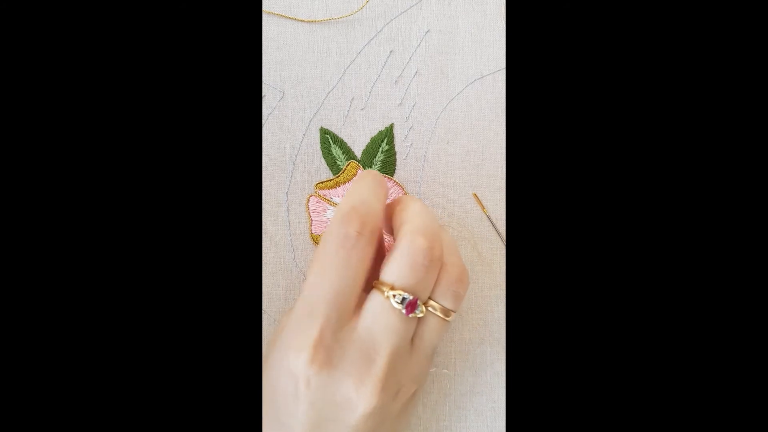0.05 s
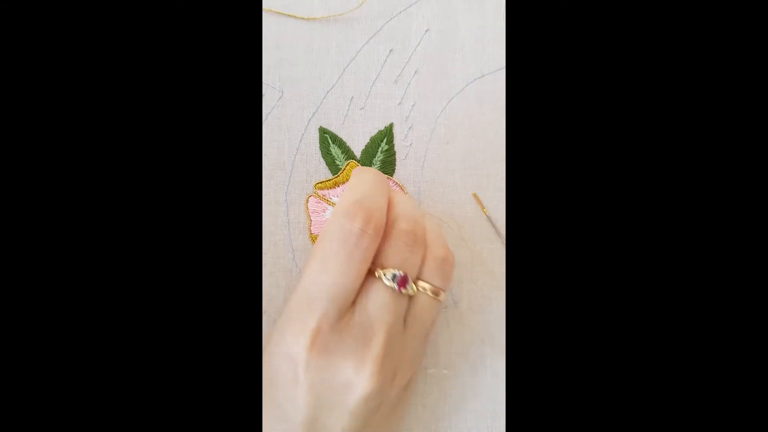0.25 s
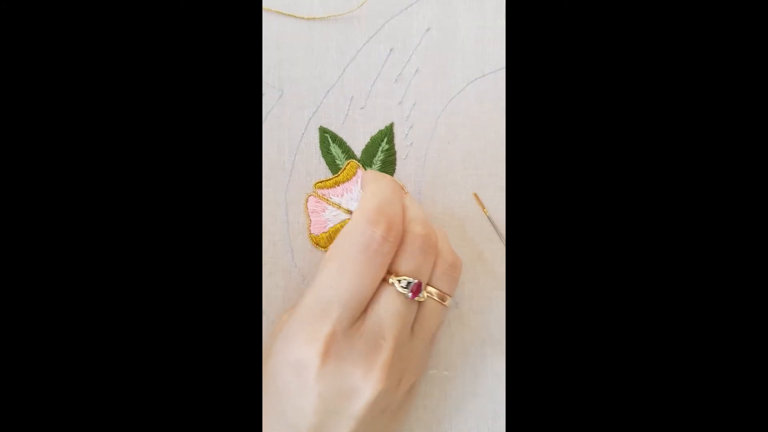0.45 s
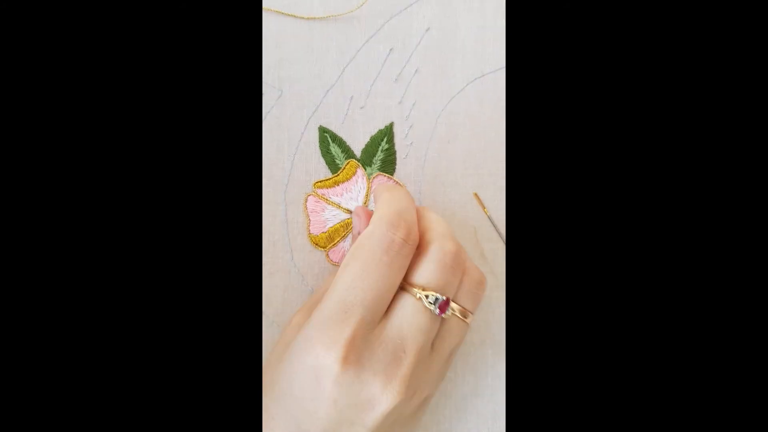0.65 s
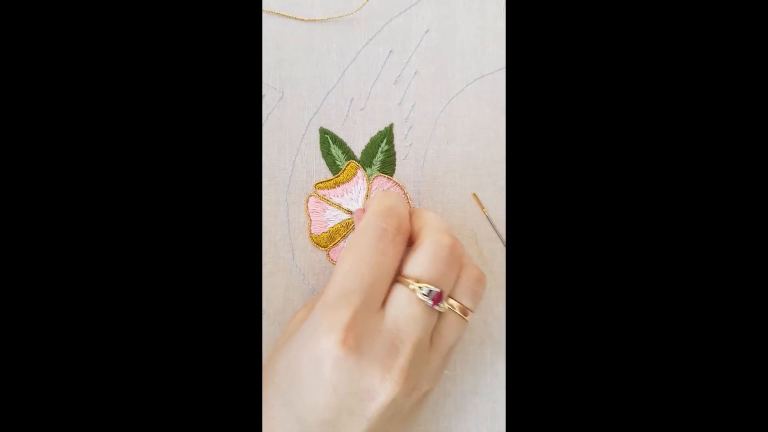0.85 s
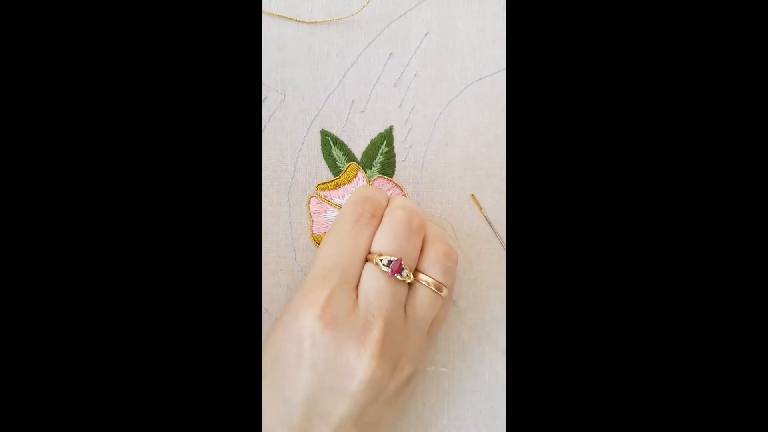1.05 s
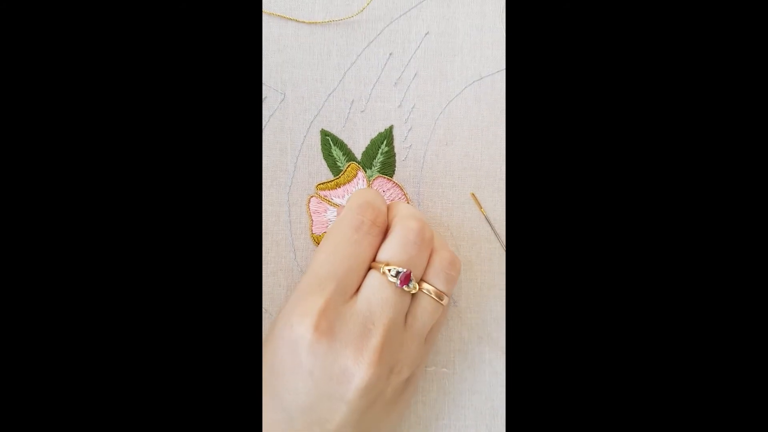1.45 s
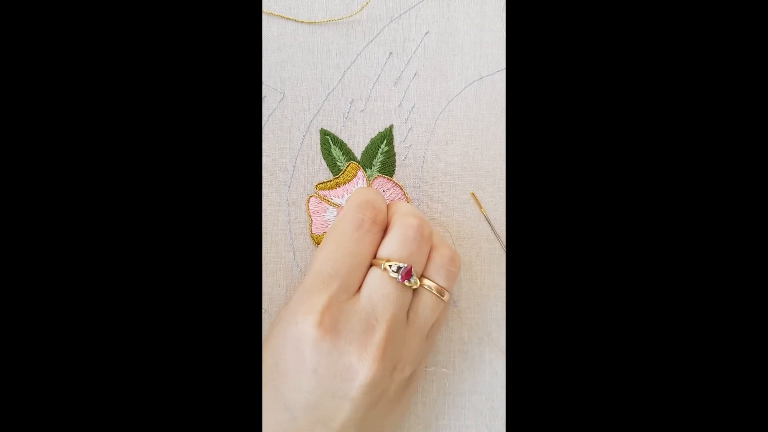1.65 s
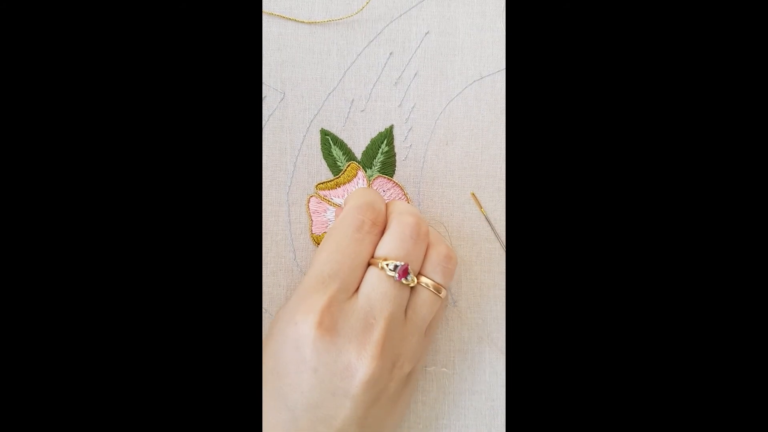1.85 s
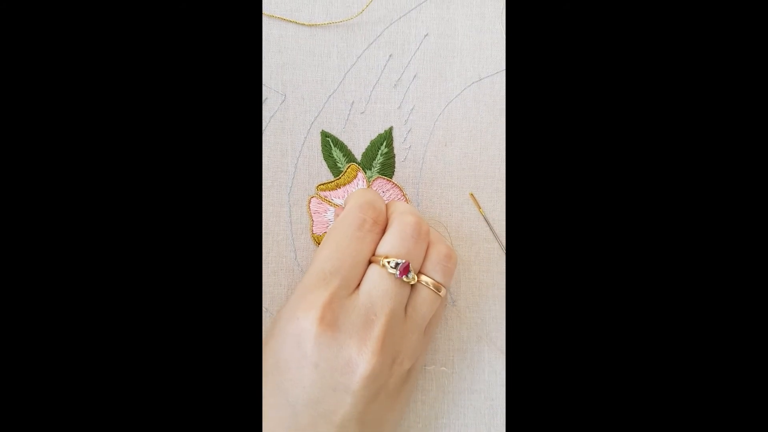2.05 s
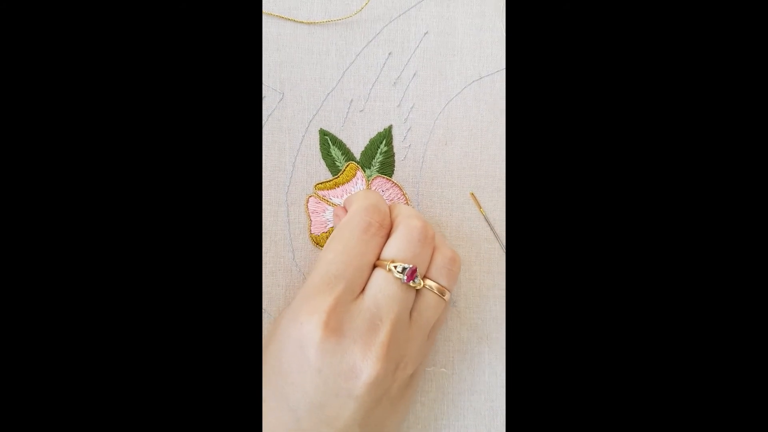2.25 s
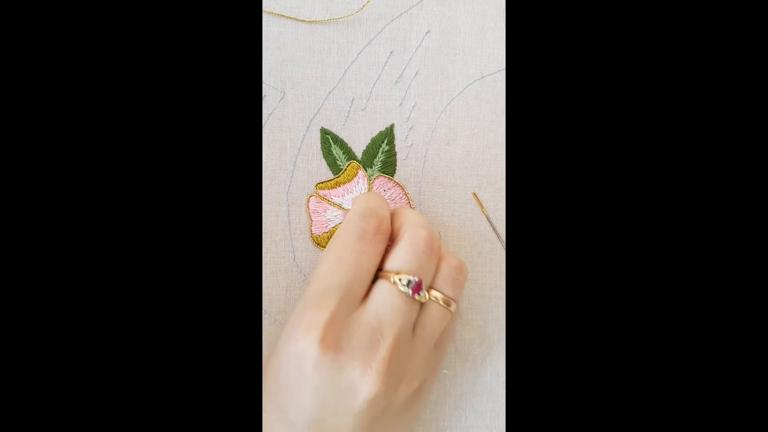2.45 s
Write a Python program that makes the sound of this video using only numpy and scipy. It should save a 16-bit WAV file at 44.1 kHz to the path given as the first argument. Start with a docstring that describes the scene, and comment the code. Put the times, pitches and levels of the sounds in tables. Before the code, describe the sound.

Close, drum-like pops of a hook stitching stretched fabric, with faint thread rasps.

```python
"""Embroidery on a stretched cloth

A hook pops through fabric on a frame, close by in a small quiet room. Each pop is an impulse, heard as
a sharp tick, and a drum-like thud from the modes of the cloth; the last adds a short knock. Thread rasps
by friction and squeaks twice. A low rumble swells between the first stitches, over faint hum and hiss."""
import sys
import numpy as np
from scipy import signal
from scipy.fft import rfft, irfft, next_fast_len
from scipy.io import wavfile
from scipy.ndimage import map_coordinates

SR = 44100
rng = np.random.default_rng(int(sys.argv[2]) if len(sys.argv) > 2 else 0)


def output_pcm(signal):
    """Save a mono or channel-first signal as 16-bit PCM at the path in sys.argv[1].

    Samples are clipped to [-1, 1] before scaling.
    """
    pcm = np.clip(np.atleast_2d(signal).T, -1, 1) * 32767
    wavfile.write(sys.argv[1], SR, np.round(pcm).astype(np.int16))


N = 114660


def amp(db):
    """Amplitude ratio of a level in decibels."""
    return 10 ** (np.asarray(db) / 20)


def unit(x):
    """Normalisation to rms 1."""
    return x / np.sqrt(np.mean(x ** 2) + 1e-20)


def along(points, hz):
    """Interpolation of (frequency, value) points on a logarithmic frequency axis."""
    f, v = np.transpose(points)
    return np.interp(np.log(hz + 1), np.log(f + 1), v)


def clock():
    """Sample times in seconds."""
    return np.arange(N) / SR


def wobble(rate):
    """Smooth random modulation: a spline through rate knots a second."""
    return map_coordinates(rng.standard_normal(int(N * rate / SR) + 4), [clock() * rate])


def swell(s, rise, fall):
    """Asymmetric Gaussian envelope that peaks at time s."""
    t = clock() - s
    return np.exp(-.5 * (t / np.where(t < 0, rise, fall)) ** 2)


def add(track, s, x):
    """Superposition of x on track at time s."""
    part = track[max(round(s * SR), 0):][:len(x)]
    part += x[:len(part)]


def filtered(x, response):
    """Linear filtering: the spectrum of x times a complex frequency response."""
    size = next_fast_len(N + SR // 2)
    return irfft(rfft(x, size) * response(np.fft.rfftfreq(size, 1 / SR)), size)[..., :N]


def stereo_noise(spectrum):
    """Diffuse-field noise: coherent between the channels in the bass, incoherent in the treble."""
    # likeness of left and right: (frequency [Hz], correlation [ratio])
    coherence = [(60, 0.88), (350, 0.79), (900, 0), (2500, 0), (12000, 0)]

    def response(hz):
        angle = np.arccos(np.clip(along(coherence, hz), -1, 1)) / 2
        return amp(along(spectrum, hz)) * [np.cos(angle), np.sin(angle)]

    mid, side = filtered(rng.standard_normal((2, N)), response)
    return np.array([mid + side, mid - side])


def tone(hz, waver_hz):
    """Sinusoid of rms 1 with slight random frequency modulation."""
    cycles = np.cumsum(hz + waver_hz * wobble(14)) / SR
    return np.sqrt(2) * np.sin(2 * np.pi * (cycles + rng.random()))


def grainy(spectrum, per_s):
    """Shot noise of rms 1: random impulses shaped by a spectrum."""
    grains = rng.standard_normal(N) * (rng.random(N) < per_s / SR)
    return unit(filtered(grains, lambda hz: amp(along(spectrum, hz))))


def room_tone():
    """Stationary background: a line spectrum of hum over broadband noise."""
    # noise floor: (frequency [Hz], relative level [dB])
    floor = [(20, -2), (55, 0.5), (100, -1), (160, -3.5), (210, -16.5), (270, -3), (400, -12.5),
             (620, -14.5), (850, -22), (1300, -26.5), (3000, -28), (7500, -33.5), (10000, -31),
             (12500, -27.5), (16000, -29.5)]
    # hum tones: (frequency [Hz], level [dB])
    hum = [(140, -73.5), (269, -86), (344.5, -72.5), (441, -83), (592, -84), (630, -81.5)]
    hiss = amp(-63.5) * unit(stereo_noise(floor))
    return hiss + sum(amp(db) * tone(hz, waver_hz=1.34) for hz, db in hum)


def rumble():
    """Amplitude-modulated low noise with short droning tones in it."""
    # rumble spectrum: (frequency [Hz], relative level [dB])
    spectrum = [(20, -14.5), (60, -16.5), (85, -9.5), (115, 4), (150, -5), (185, 0.5), (240, -12),
                (350, -14), (550, -26.5), (900, -39.5), (2000, -59.5), (6000, -61)]
    # rumble envelope: (time [s], level [dB])
    levels = [(0, -52.5), (.08, -61), (.2, -49), (.36, -49.5), (.47, -42.5), (.6, -48.5), (.68, -45),
              (.74, -45), (.92, -49), (1.05, -58), (1.2, -72), (1.6, -72), (1.85, -60.5), (2.15, -65),
              (2.4, -82), (2.6, -63)]
    # low tones: (centre time [s], half length [s], frequency [Hz], level [dB])
    drones = [(0.15, 0.07, 199.6, -54), (0.361, 0.032, 183, -47.5), (0.67, 0.037, 116.1, -39.5),
              (0.875, 0.048, 190.1, -50.5), (2.054, 0.1, 141.6, -55.5)]
    out = unit(stereo_noise(spectrum)) * amp(np.interp(clock(), *np.transpose(levels)))
    for s, half, hz, db in drones:
        out += amp(db) * np.exp(-((clock() - s) / half) ** 4) * tone(hz, waver_hz=2.4)
    return out


def thud(tilt_db, attack_s, tuning):
    """Free vibration of a membrane: the cloth springs back in one heavy swing and its damped modes ring."""
    # modes of the stretched cloth: (frequency [Hz], level [dB], T60 [s])
    modes = [(40, -22, 0.9), (70.1, -6, 0.36), (104.6, 0, .2), (137.07, -1, 0.37), (167.5, -3.5, 0.35),
             (243.6, -5.5, 0.16), (263, -6, 0.2), (338.6, -6, 0.23), (432.2, -13, 0.17), (458, -8.5, 0.1),
             (579, -13, 0.1), (678, -24.5, 0.15), (764.5, -24, 0.14), (950.4, -20.5, 0.076),
             (1070, -23, 0.05)]
    swing_hz, swing_db, swing_t60_s = 150, 2, 0.071
    scatter_db, detune = 2.3, 0.0118  # each stitch stretches the cloth a little differently
    t = np.arange(SR // 2) / SR
    ring = np.zeros_like(t)
    for hz, db, t60 in [*modes, (swing_hz, swing_db, swing_t60_s)]:
        level_db = db + scatter_db * rng.normal() + tilt_db * np.log2(hz / swing_hz)
        mode_hz = hz * (tuning + detune * rng.normal())
        ring += amp(level_db - 60 * t / t60) * np.cos(2 * np.pi * mode_hz * t)
    return ring * (1 - np.exp(-(t / attack_s) ** 2))


def rasp():
    """Sliding friction: fibres slip through the weave in dense tiny impulses."""
    # thread pulls: (peak time [s], rise [s], fall [s], level [dB])
    pulls = [(.036, 0.024, 0.024, -72), (2.199, 0.0045, 0.0091, -61), (2.238, 0.025, 0.031, -53.5)]
    # rasp of a pull: (frequency [Hz], relative level [dB])
    pull_spectrum = [(100, -17), (400, 2), (1000, 2), (2000, -6), (4000, -9.5), (5500, -19), (7000, -23.5),
                     (10000, -24), (12800, -20), (15000, -60)]
    # hiss of the thread around the squeaks: (frequency [Hz], relative level [dB])
    slide_spectrum = [(500, -10), (2200, 0), (4000, -7), (6500, -15), (8500, -6.5), (11500, -8),
                      (13500, -8), (15500, -14)]
    grains_per_s = 6700
    envelope = sum(amp(db) * swell(s, rise, fall) for s, rise, fall, db in pulls)
    pulling = grainy(pull_spectrum, grains_per_s) * envelope
    sliding = amp(-72.5) * grainy(slide_spectrum, grains_per_s) * swell(.492, rise=.031, fall=.031)
    return pulling + sliding


def tick(cut_hz, size=2048):
    """Sudden release radiates a minimum-phase pulse, here of peak 1; a softer release is duller."""
    # pulse spectrum before the low-pass: (frequency [Hz], relative level [dB])
    spectrum = [(30, -59.5), (300, 8.5), (780, 3), (1080, 9), (1400, 4.5), (1750, 3.5), (2150, -2.5),
                (2600, -4), (3900, -3.5), (5600, -9.5), (9000, -9.5), (16000, -11)]
    hz = np.fft.rfftfreq(size, 1 / SR)
    magnitude = amp(along(spectrum, hz)) / np.sqrt(1 + (hz / cut_hz) ** 4)
    cepstrum = irfft(np.log(magnitude))
    pulse = irfft(np.exp(rfft(2 * cepstrum[:size // 2], size)))  # causal half: energy comes first
    return pulse / np.abs(pulse).max()


def crackle(pop_s):
    """Relaxation: the cloth settles after a pop in a fading burst of sparse impulses."""
    # crackle spectrum: (frequency [Hz], relative level [dB])
    spectrum = [(100, -17), (600, 15), (1500, 5), (3000, 2), (4800, -7), (6500, -17), (14000, -20)]
    return grainy(spectrum, per_s=500) * swell(pop_s + 0.011, rise=0.0068, fall=0.04)


def hook():
    """Impulsive excitation: the hook nudges the cloth, pops through it or catches the thread."""
    # soft pushes on the cloth: (time [s], level [dB], tilt [dB/octave])
    nudges = [(.025, -49.5, 3), (0.498, -53, 3), (0.665, -55, 4), (.688, -60, -8), (1.661, -49.5, -1),
              (1.89, -58.5, 3), (2.185, -41.5, 0), (2.474, -57, 1.5)]
    # punctures: (time [s], thud level [dB], thud tilt [dB/octave], tick level [dB],
    # tick cut-off [Hz], cloth tuning [ratio], thud attack [s])
    pops = [(0.213, -26.5, 0, -23.5, 2140, .985, 0.00076),
            (0.9593, -30.5, 0.94, -28.5, 1630, 0.91, 0.00071), (1.3930, -26.5, .5, -23, 3220, 1.0, 0.00067),
            (2.1957, -35.5, -1.5, -45, 810, 1.02, 0.0024)]
    # lighter ticks on the thread after a pop: (time [s], level [dB], cut-off [Hz])
    catches = [(0.2669, -39, 2020), (1.0018, -45.5, 1700), (1.4478, -35.5, 2400)]
    crackle_db = -36.5  # relative to the tick
    out = np.zeros(N)
    for s, db, tilt_db in nudges:
        add(out, s, amp(db) * thud(tilt_db, attack_s=0.0026, tuning=0.94))
    for s, thud_db, tilt_db, tick_db, cut_hz, tuning, attack_s in pops:
        add(out, s, amp(thud_db) * thud(tilt_db, attack_s, tuning))
        add(out, s, amp(tick_db) * tick(cut_hz))
        out += amp(tick_db + crackle_db) * crackle(s)
    for s, db, cut_hz in catches:
        add(out, s, -amp(db) * tick(cut_hz))
    return out


def squeaks_and_knock():
    """Tone bursts of unsteady pitch: two thread squeaks, and the hook's 1 kHz knock at the last pop."""
    # two squeaks, then the knock: (peak time [s], rise and fall [s], frequency [Hz], level [dB])
    bursts = [(0.484, .004, 1910, -66), (.499, 0.0025, 1910, -53.5), (2.201, 0.0046, 1025, -53.5)]
    jitter = 0.108  # share of the pitch
    out = np.zeros(N)
    for s, width, hz, db in bursts:
        pitch = hz * (1 + jitter * wobble(1200))
        out += amp(db) * swell(s, width, width) * np.sin(2 * np.pi * np.cumsum(pitch) / SR)
    return out


def reverberation(x):
    """Convolution with a diffuse tail that decays exponentially, fastest in the treble."""
    # reverberation time: (frequency [Hz], T60 [s])
    t60 = [(80, 0.76), (300, 0.33), (1200, 0.26), (4000, 0.24), (12000, 0.19)]
    # tail spectrum: (frequency [Hz], gain [dB])
    colour = [(40, -12), (150, -18.5), (400, -0.5), (1000, -3), (2500, -3), (5000, 1), (9000, 2),
              (15000, 2.5)]
    build_s = 0.0057
    hz, t, bands = signal.stft(stereo_noise(colour)[:, :SR // 2], SR, nperseg=256)
    decay = amp(-60 * t / along(t60, hz)[:, None]) * (1 - np.exp(-t / build_s))
    decay /= np.sqrt(np.sum(decay ** 2, axis=1, keepdims=True) * t[1] * SR)  # unit energy in each band
    tail = signal.istft(bands * decay, SR, nperseg=256)[1]
    return signal.fftconvolve(x[None], tail, axes=1)[:, :N]


def room(x, walls_db, tail_db):
    """Superposed paths: direct sound from the left, two early reflections and reverberation."""
    # level difference of the direct sound: (frequency [Hz], left over right [dB])
    left_db = [(60, 2.8), (300, 3.6), (1000, 5.2), (4000, 7.1), (15000, 6)]
    # wall reflections: (delay [s], left gain [dB], right gain [dB])
    echoes = [(.0040, -13.5, -14), (0.0193, -12, -18.5)]
    left_lead_s, wall_cut_hz, tail_left_db = 0.00013, 8500, 1
    side = np.array([[.5], [-.5]])

    def direct(hz):
        return amp(side * along(left_db, hz)) * np.exp(2j * np.pi * hz * side * left_lead_s)

    def walls(hz):
        paths = sum(amp([[left], [right]]) * np.exp(-2j * np.pi * hz * s) for s, left, right in echoes)
        return paths / (1 + 1j * hz / wall_cut_hz)

    tail = amp(tail_db + side * tail_left_db) * reverberation(x)
    return filtered(x, direct) + amp(walls_db) * filtered(x, walls) + tail


def scene():
    """Superposition of the stitching in the room and its background."""
    pops = room(hook(), walls_db=0, tail_db=-1)
    small_sounds = room(rasp() + squeaks_and_knock(), walls_db=-13, tail_db=-4.5)
    return room_tone() + rumble() + pops + small_sounds


def record(dry):
    """Band limiting by an ideal low-pass filter."""
    top_hz = 15780
    return filtered(dry, lambda hz: hz < top_hz)


dry = scene()
out = record(dry)
output_pcm(out)
```